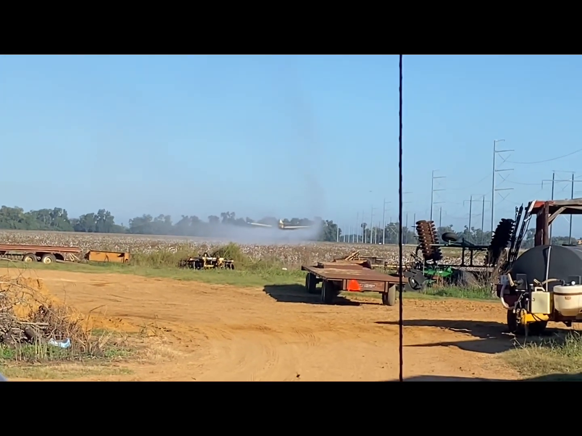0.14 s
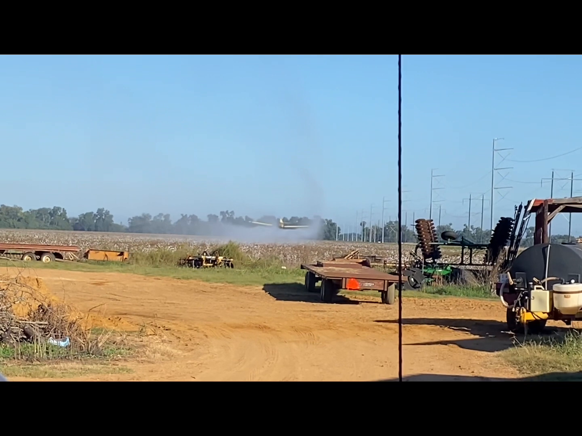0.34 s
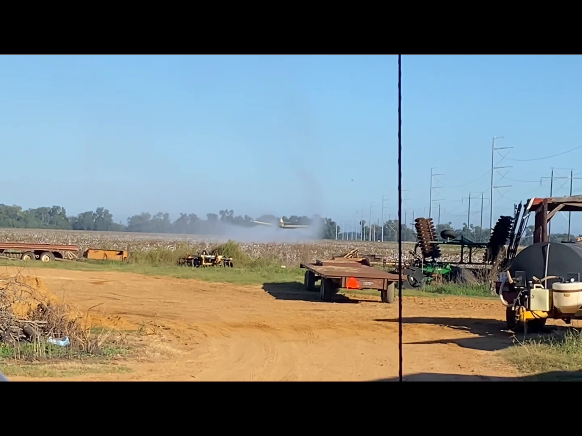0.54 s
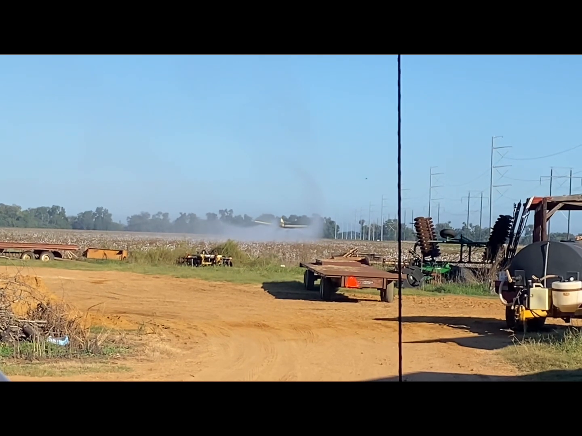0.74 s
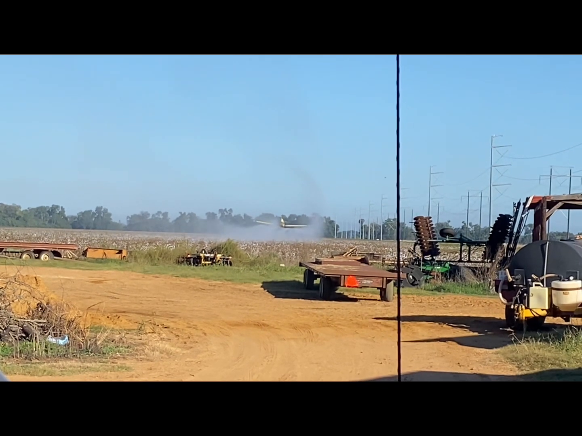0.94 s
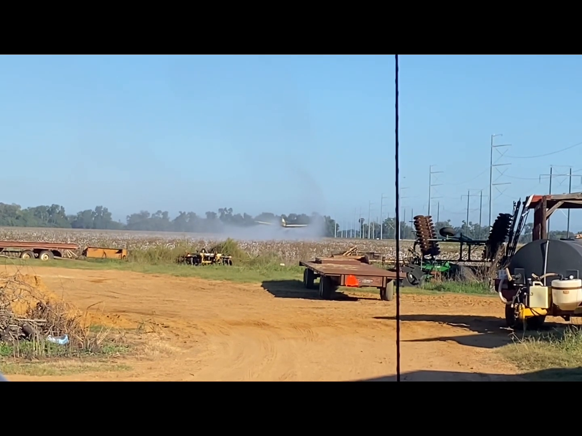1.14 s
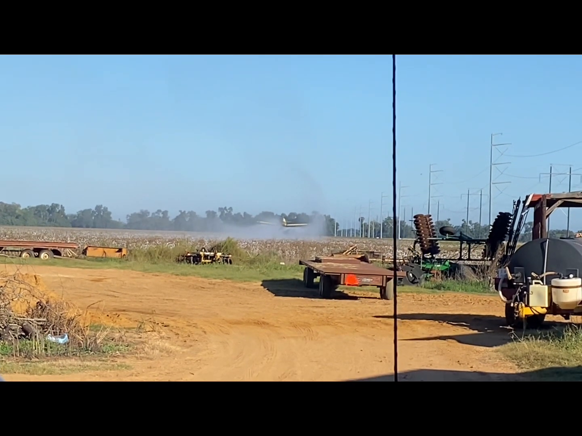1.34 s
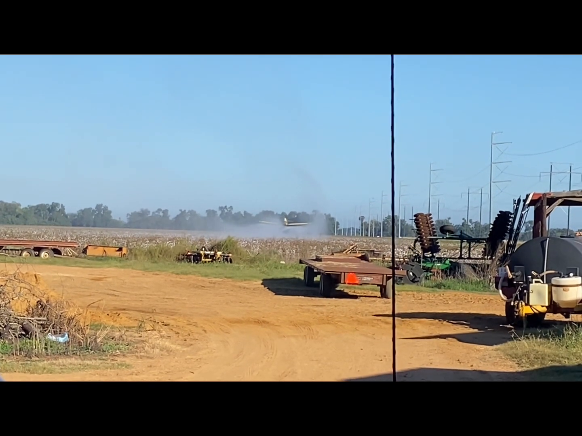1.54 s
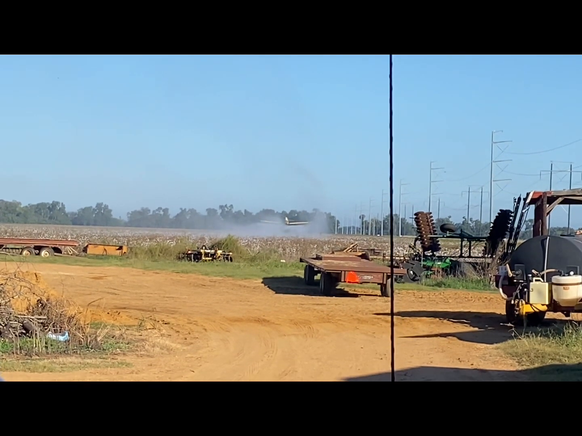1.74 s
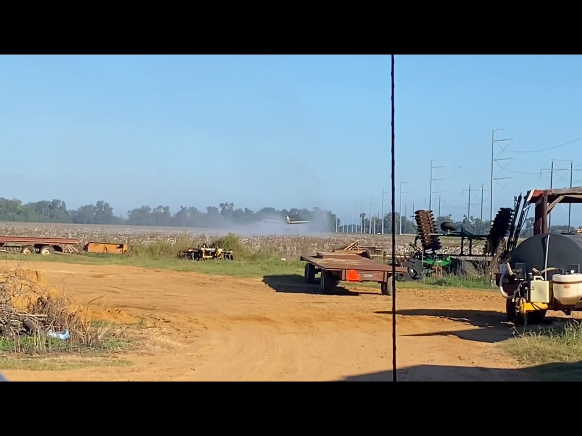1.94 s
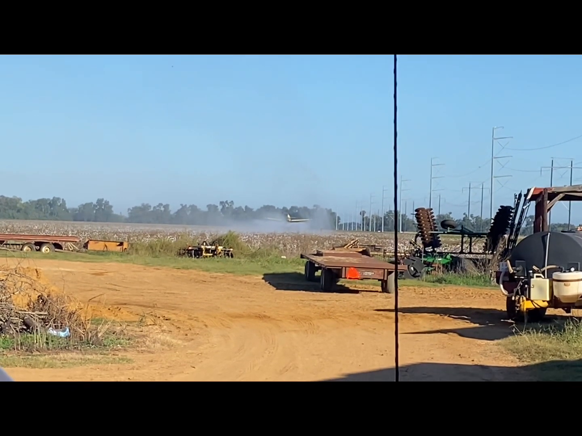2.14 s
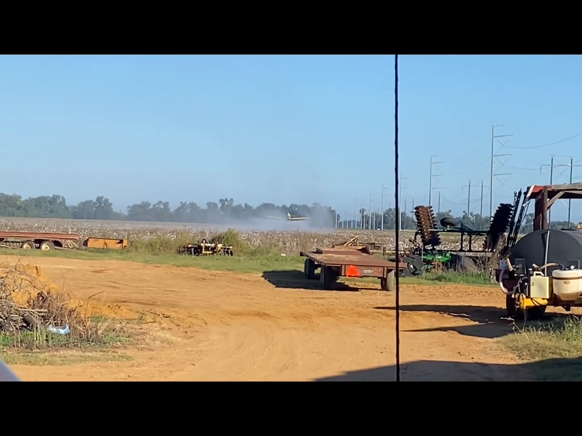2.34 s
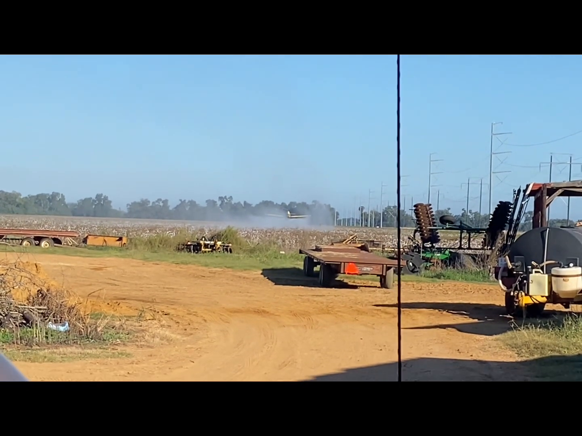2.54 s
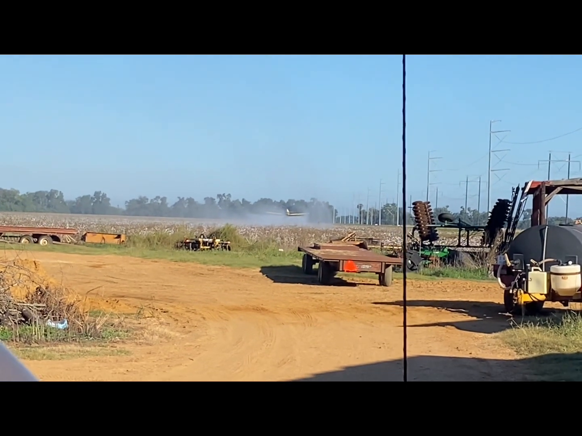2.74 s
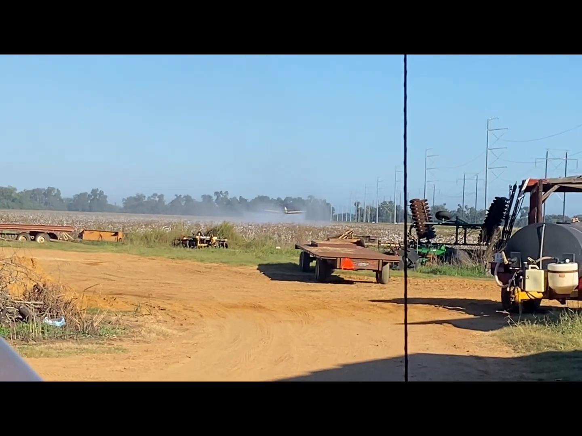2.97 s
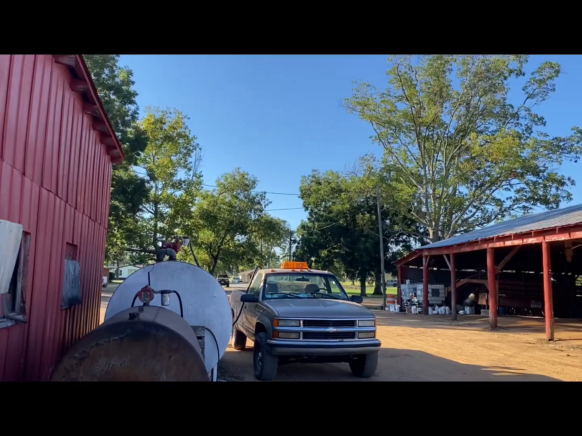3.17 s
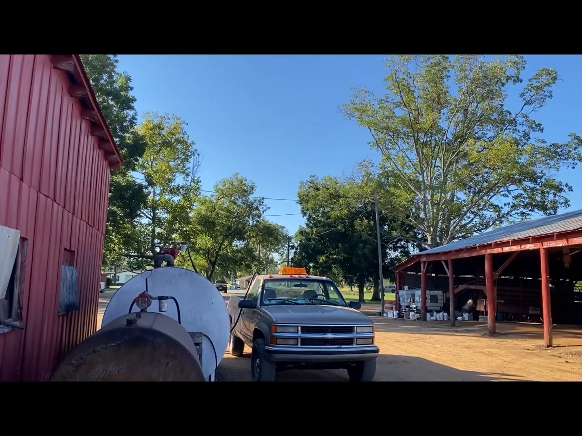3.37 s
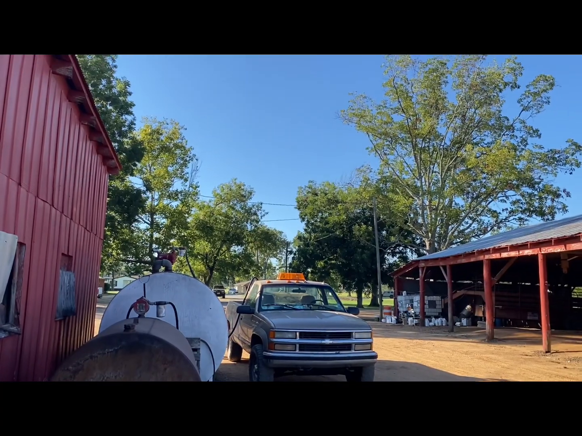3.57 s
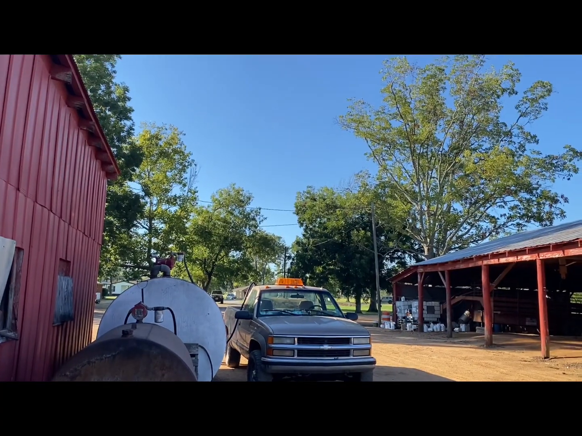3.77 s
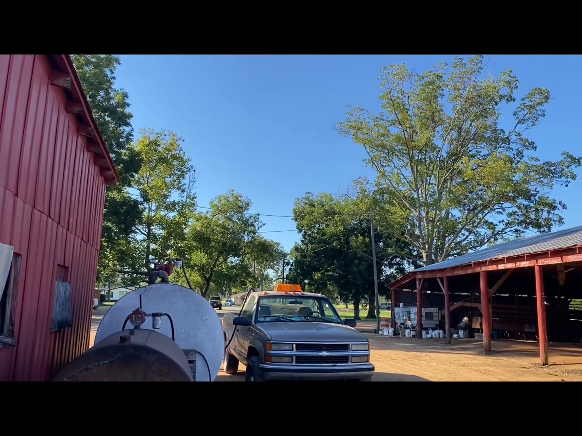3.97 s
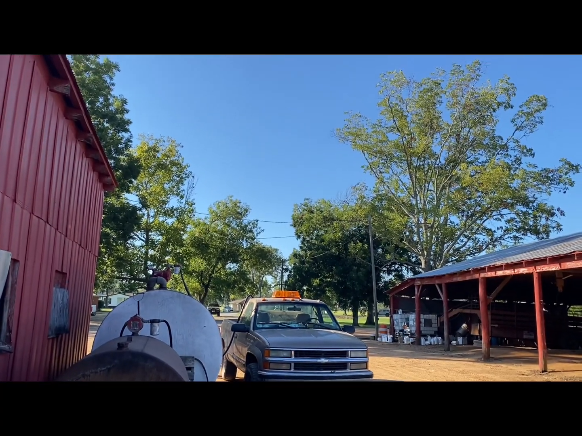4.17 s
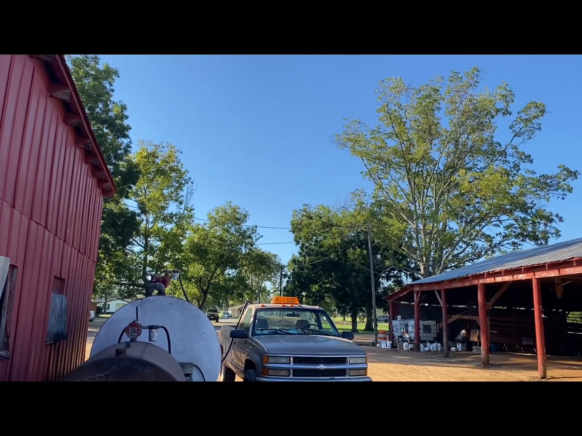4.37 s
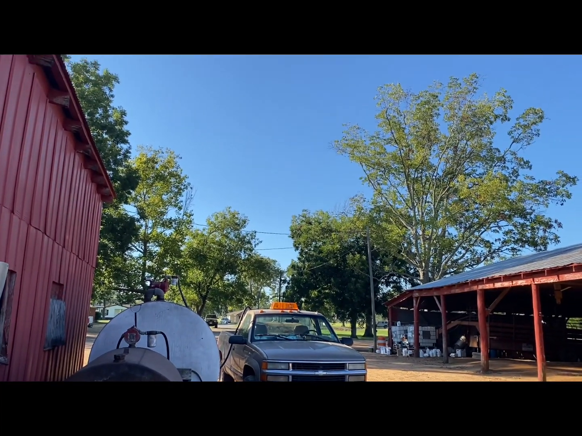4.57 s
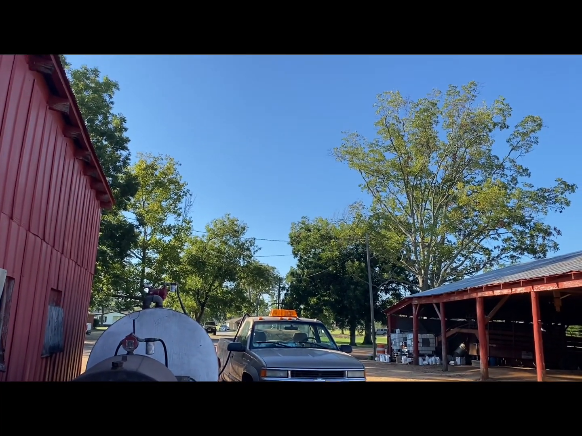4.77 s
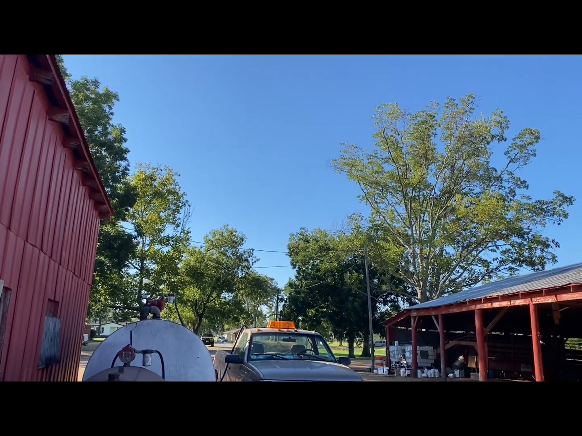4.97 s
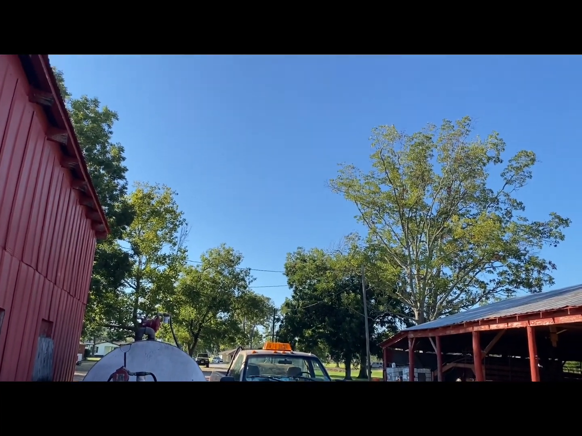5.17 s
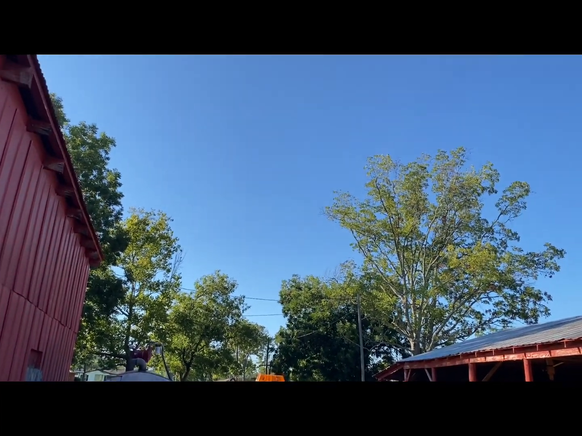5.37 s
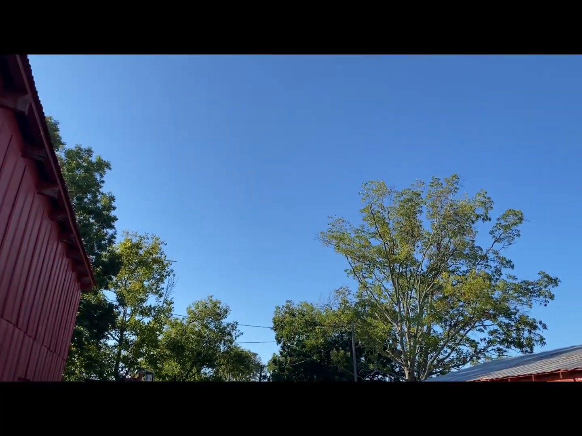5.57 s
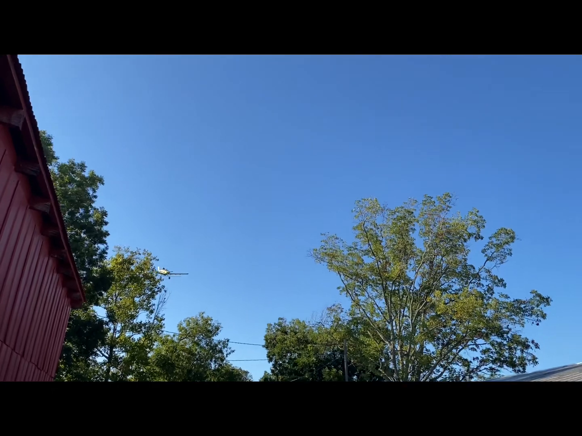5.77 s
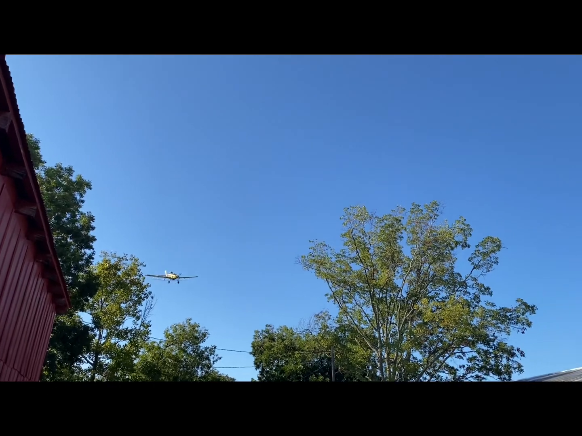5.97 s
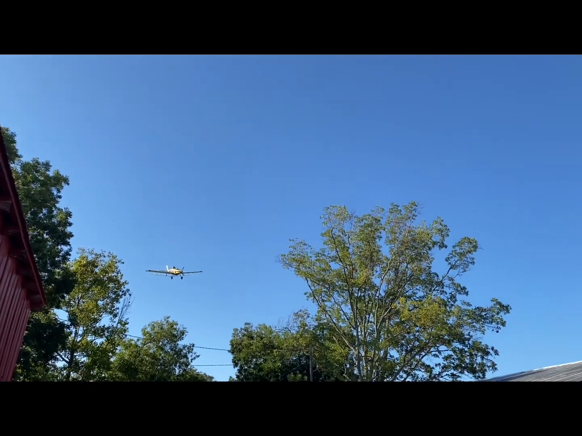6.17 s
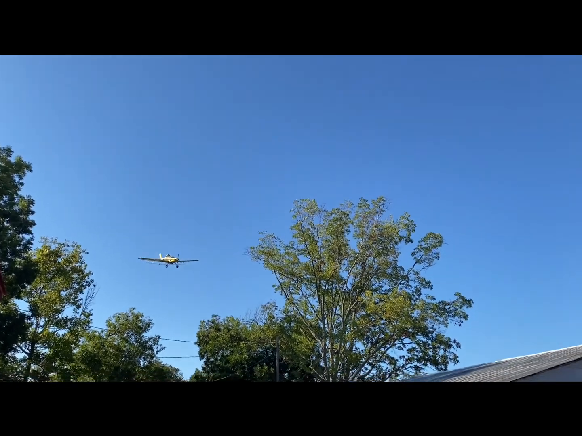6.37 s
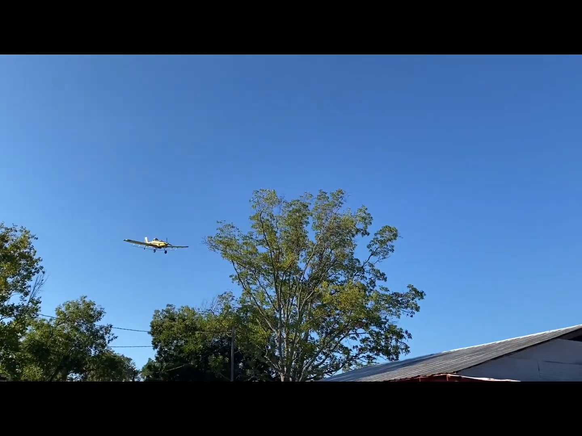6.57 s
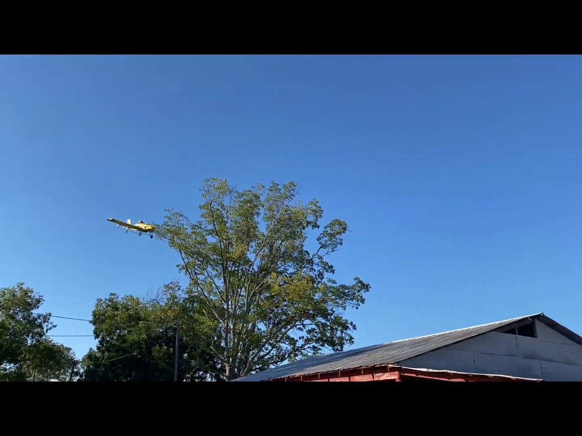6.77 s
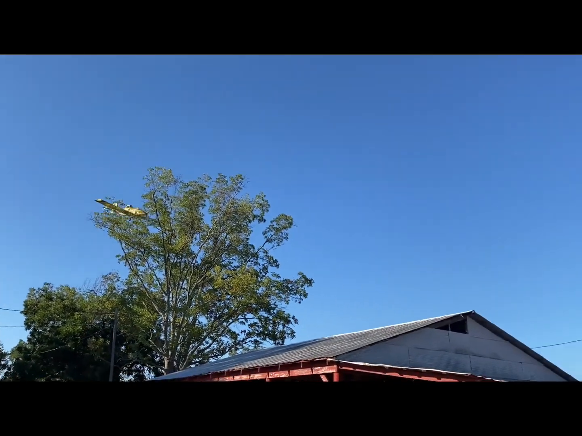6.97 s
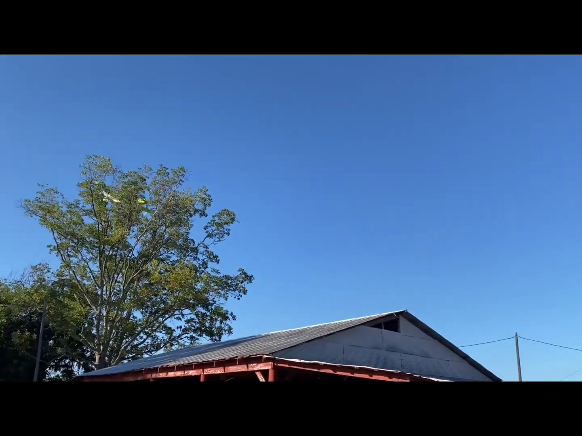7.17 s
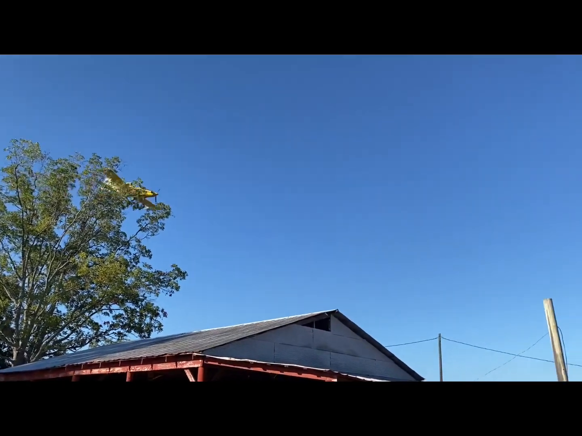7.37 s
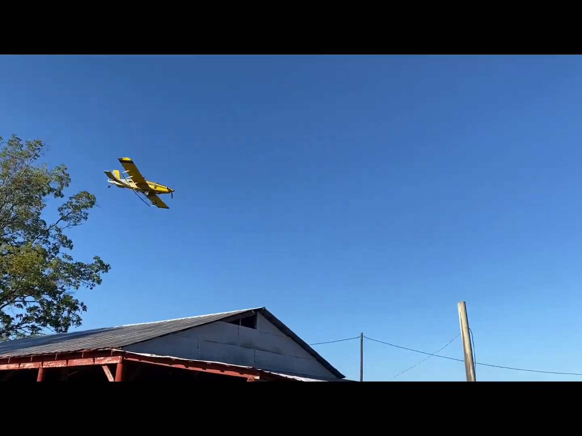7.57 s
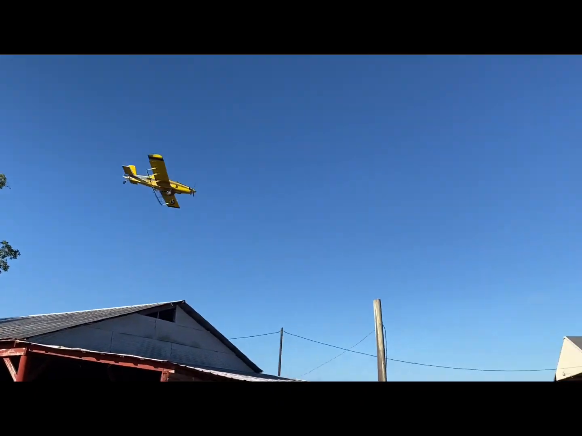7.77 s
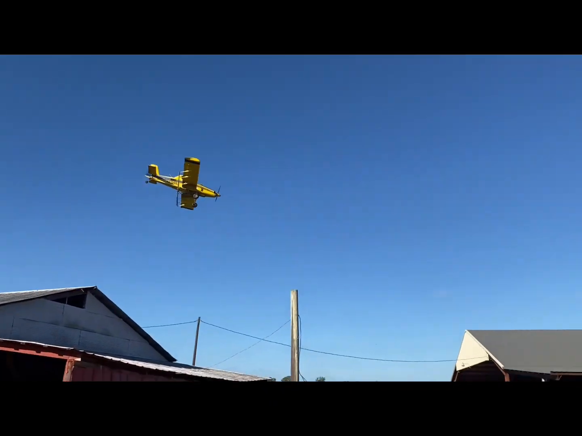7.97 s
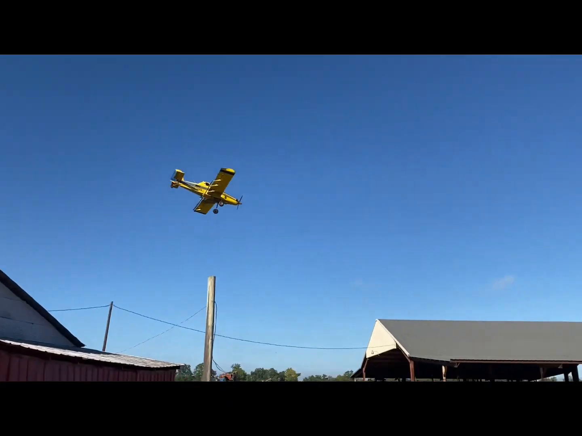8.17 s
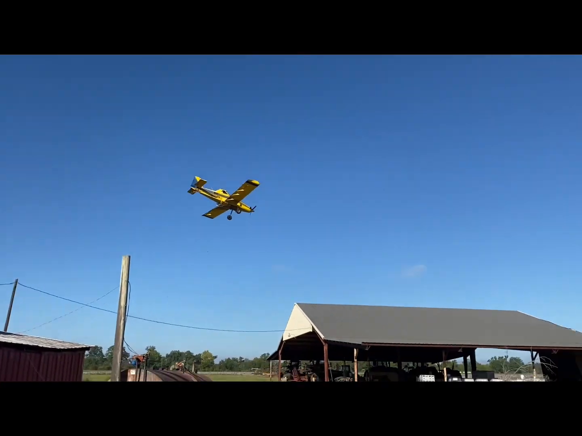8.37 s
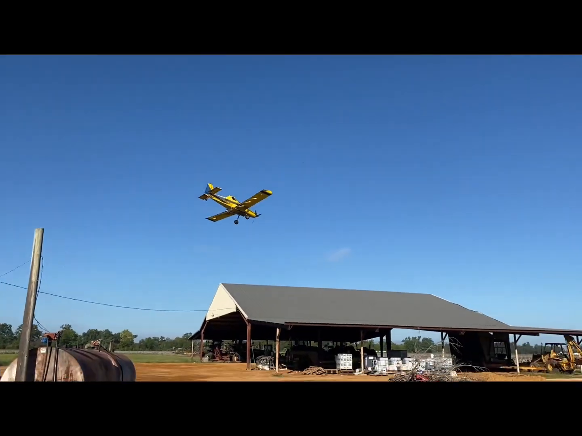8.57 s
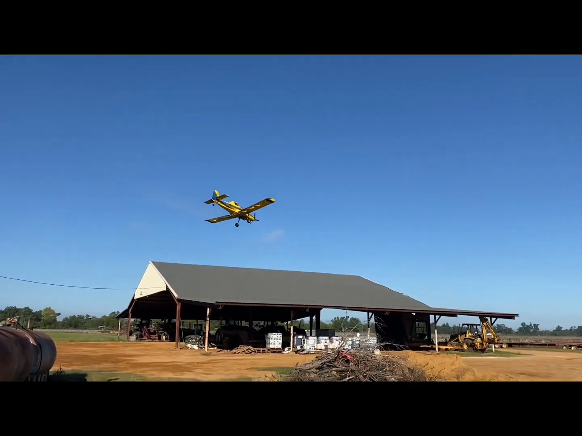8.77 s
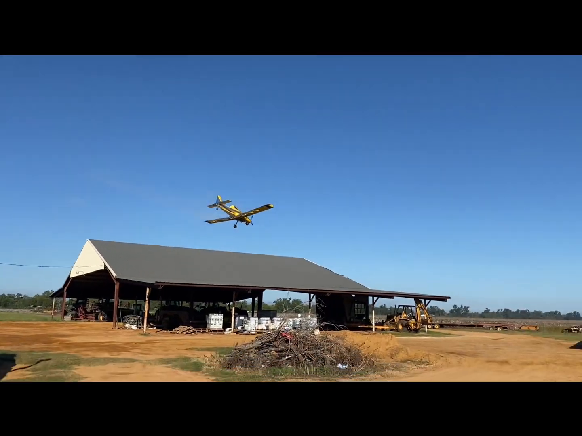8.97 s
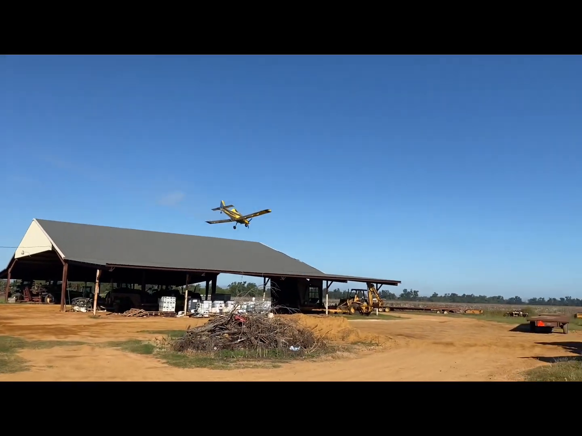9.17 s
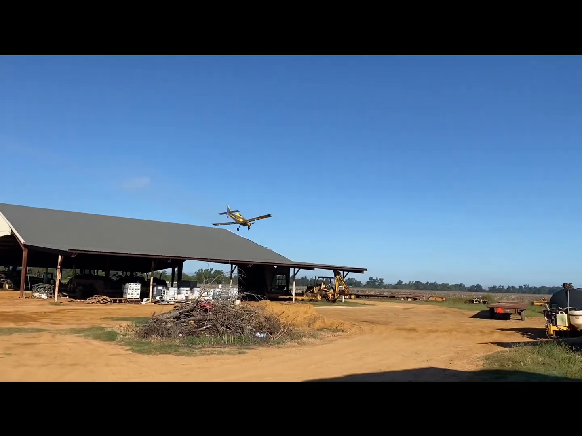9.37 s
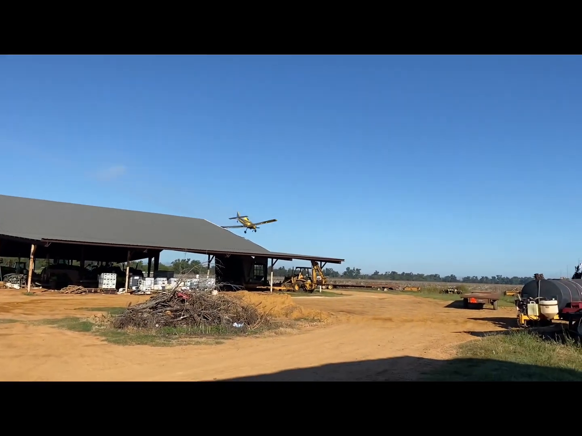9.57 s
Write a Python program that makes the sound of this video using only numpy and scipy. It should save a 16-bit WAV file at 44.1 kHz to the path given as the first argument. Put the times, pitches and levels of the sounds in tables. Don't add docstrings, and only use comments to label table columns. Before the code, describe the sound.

Outdoors on a farm, a pump engine drones very close to the microphone, its low tones beating and its casing rattling with a hissy edge. Abruptly the spot changes: the engine is duller and further off, and a turboprop spray plane approaches from behind trees, swells into a loud roaring, whining pass, then drops in pitch as it leaves.

```python
import sys
import numpy as np
from scipy import signal
from scipy.fft import rfft, irfft, next_fast_len
from scipy.io import wavfile
from scipy.ndimage import uniform_filter1d, map_coordinates

SR = 44100
rng = np.random.default_rng(int(sys.argv[2]) if len(sys.argv) > 2 else 0)


def digitize_waveform(pressure):
    field = np.atleast_2d(pressure).T
    bounded = np.clip(field, -1, 1)
    quanta = np.round(bounded * 32767).astype(np.int16)
    wavfile.write(sys.argv[1], SR, quanta)


def volts(x):
    e = np.asarray(x, float) / 20
    return 10 ** e


N = 423801


def unit(x):
    return x / np.sqrt(np.mean(x ** 2) + 1e-20)


def along(points, hz):
    f, v = np.transpose(points)
    return np.interp(np.log(hz + 1), np.log(f + 1), v)


def shape(points):
    return lambda hz: volts(along(points, hz))


def wobble(rate):
    knots = rng.standard_normal(int(N * rate / SR) + 4)
    return map_coordinates(knots, [np.arange(N) * rate / SR])


def filtered(x, response):
    m = next_fast_len(N + SR // 2)
    return irfft(rfft(x, m) * response(np.fft.rfftfreq(m, 1 / SR)), m)[..., :N]


def rush(gain, alike, patchy_db):
    z = signal.stft(rng.standard_normal((2, N)), nperseg=512)[2]
    field = uniform_filter1d(rng.standard_normal(z.shape[1:]), size=6, axis=0)
    field = uniform_filter1d(field, size=12, axis=1)
    pair = signal.istft(z * volts(patchy_db * unit(field)), nperseg=512)[1][:, :N]
    turn = lambda hz: np.arccos(np.clip(along(alike, hz), -1, 1)) / 2
    mid, side = filtered(pair, lambda hz: gain(hz) * [np.cos(turn(hz)), np.sin(turn(hz))])
    return unit(np.array([mid + side, mid - side]))


def placed(pair, pan, lag_ms):
    sides = np.array([[.5], [-.5]])
    lag = lambda hz: np.exp(-2j * np.pi * hz * sides * lag_ms / 1000)
    return filtered(pair, lambda hz: volts(sides * along(pan, hz)) * lag(hz))


def tone(turns, db, flutter_db, drift):
    level = np.sqrt(2) * volts(db + flutter_db * wobble(12))
    return level * np.sin(2 * np.pi * turns + drift * wobble(9))


def casing(f):
    # centre_hz, width_hz, level_db
    rattle = [(565, 65, 10), (710, 38, 8.5), (1020, 66, 5), (2300, 60, 0.5), (2721, 51, 11), (2990, 180, 4),
              (3116, 190, 3), (3300, 22, 11.5), (3510, 48, 8), (4090, 340, -5.5), (4730, 54, 7),
              (4905, 53, 6.5)]
    return volts(sum(db * (w / 2) ** 2 / ((f - c) ** 2 + (w / 2) ** 2) for c, w, db in rattle))


def pump(shaft_hz, orders, form, buzz_db):
    t = np.arange(N) / SR
    turns = shaft_hz * t + 0.00084 * wobble(2)
    belt = 3.56 * (t - .13) + .5
    tones = 0
    for (k, db, pan_db, belt_db), start in zip(orders, rng.random(len(orders))):
        k = round(k)
        order = np.sin(2 * np.pi * (k * turns + start))
        sideband = volts(belt_db) * np.sin(2 * np.pi * (k * turns + start + belt))
        sides_db = db + 1 + pan_db * np.array([[.5], [-.5]]) - abs(pan_db) / 4
        tones = tones + volts(sides_db) * (order + sideband)
    cycle = rng.standard_normal((2, 1024))
    sides = (cycle[0], 0.92 * cycle.sum(0))
    buzz = np.array([np.interp(turns % 1, np.arange(1024) / 1024, side, period=1) for side in sides])
    buzz = filtered(buzz, lambda f: shape(form)(f) * casing(f) * (f > 250) * (f < 5500))
    return tones, volts(buzz_db) * unit(buzz)


def near_spot():
    # multiple, level_db, left_minus_right_db, belt_sideband_db
    orders = [(1.99, -43.5, -10, -18), (6.08, -31.5, -7, -2), (7.2, -48, -16, -34), (7.92, -29.5, -6, -58),
              (10, -43.5, 15, -33), (12.26, -43, -19, -12), (14, -46, -16, -4.5), (14.1, -68, -6, -24),
              (15.94, -39.5, -5, -53), (17, -60, -20, -14), (17.92, -45, 6, -46), (18.56, -57, -6, 4),
              (20.1, -42, 4, -25.5), (23.3, -47, -1, -32), (24.13, -44.5, -33, -40), (25, -67, 20, -16),
              (25.76, -46.5, -22, -29), (27.07, -63, 25, -24), (29.2, -76, -7, -21), (31.07, -49, -12, -9),
              (32, -49, -13, -27), (34.06, -49, 6, -18), (36, -42.5, -7, -38), (36.8, -50, -6, -34),
              (42.44, -65, 2, 5), (47.8, -72, -13, -12), (56.3, -58, 12, -17), (75.3, -64, -6, -15),
              (79.5, -49.5, -3, -19), (89.4, -49, 28, -11.5)]
    # frequency_hz, level_db (per Hz)
    form = [(15, -61), (25, -58), (50, -5), (140, -7.5), (320, -19.5), (570, -20.5), (1150, -22),
            (1430, -30.5), (2000, -26.5), (2730, -19.5), (3800, -23.5), (7260, -30.5), (11500, -44.5),
            (16000, -52)]
    # frequency_hz, likeness (0 to 1)
    alike = [(60, 1), (130, 0.85), (290, 0.28), (640, 0.063), (1410, 0.044), (3100, 1), (6820, 0.8),
             (15000, 0.53)]
    # frequency_hz, left_minus_right_db
    pan = [(60, -2.5), (130, 6.5), (290, -13.5), (640, 0), (1410, -5), (3100, -0.5), (6820, 0.0),
           (15000, 1)]
    start_db = [-40, -36, -36.5]
    rise_db = [-0.8, 0.77, 0.7]
    t = np.arange(N) / SR
    shaft_hz, low_hz, high_hz = 29.106, 300, 1500
    thrum_db, casing_db, hiss_db = [db + rise * t for db, rise in zip(start_db, rise_db)]
    tones, buzz = pump(shaft_hz, orders, form, buzz_db=-41.5)
    noise = rush(lambda f: shape(form)(f) * casing(f), alike, patchy_db=1.0)
    noise = noise * (1 + .08 * np.cos(2 * np.pi * shaft_hz * t)) * volts(.4 * wobble(5))
    noise = volts(-31.5) * noise + buzz
    share = lambda lo, hi: filtered(noise, lambda f: 1 / (1 + (f / hi) ** 4) - 1 / (1 + (f / lo) ** 4))
    layers = volts(thrum_db + 40.0) * share(1, low_hz)
    layers = layers + volts(casing_db + 38.5) * share(low_hz, high_hz)
    layers = layers + volts(hiss_db + 36.0) * share(high_hz, SR)
    return placed(layers, pan, lag_ms=0.022) + tones


def yard():
    # multiple, level_db, left_minus_right_db, belt_sideband_db
    orders = [(6, -49, 5, 0), (8, -45, 12, -18), (16, -54, 3, -13), (24, -53, 0, -16), (26, -56, 0, -8),
              (32, -57, 0, -3), (35, -52, 6, -7), (40, -60, 6, 0), (80, -63, 8, -13), (88, -68, 11, -14),
              (112, -65, 9, -8)]
    # frequency_hz, level_db (per Hz)
    form = [(15, -66), (25, -30), (55, -10.5), (240, -13.5), (367, 0.5), (508, -16), (820, -18),
            (1120, -12.5), (1310, -28), (2400, -28.5), (3300, -27), (3900, -34.5), (7260, -47),
            (16000, -47)]
    # frequency_hz, likeness (0 to 1)
    alike = [(60, 1), (130, 0.78), (290, 1), (640, 0.72), (1410, 0.31), (3100, 0.43), (6820, 0.31),
             (15000, 0.35)]
    # frequency_hz, left_minus_right_db
    pan = [(60, -1), (130, 3), (290, 0.5), (640, 2.5), (1410, 6.5), (3100, 5.5), (6820, -1), (15000, 4)]
    tones, buzz = pump(29.055, orders, form, buzz_db=-42.5)
    noise = rush(lambda f: shape(form)(f) * casing(f) ** 0.67, alike, patchy_db=1.5)
    noise = volts(-34 + 0.21 * wobble(3.0)) * noise
    return placed(noise + buzz, pan, lag_ms=0) + tones


def flight():
    speed_m_s, closest_m, closest_s, sound_m_s, blade_hz = 62.35, 59.5, 8.151, 343, 100.93
    sent = np.linspace(-9, 4, num=4000)
    metres = np.hypot(closest_m, speed_m_s * sent)
    cos = speed_m_s * sent / metres
    s = closest_s + sent + (metres - closest_m) / sound_m_s
    spread_db = 20 * np.log10(closest_m / metres)
    return s, metres, cos, blade_hz / (1 + speed_m_s * cos / sound_m_s), spread_db


def heard(rows):
    s = flight()[0]
    return [np.interp(np.arange(N) / SR, s, row) for row in rows]


def blade_turns():
    return np.cumsum(heard([flight()[3]])[0]) / SR


def trees():
    return 1 / (1 + np.exp(np.clip((flight()[0] - 6.17) / 0.044, -50, 50)))


def fields():
    _, metres, cos, _, _ = flight()
    return np.clip(metres - 201, 0, None) * (cos < 0) / 100


def mirrors():
    # gain, delay_ms per bearing cosine, delay_ms per bearing sine, fixed_delay_ms
    rows = [
        (.59, -1.22, 4.05, .12),
        (.2, -8.64, 3.0, 1.16),
        (-.21, 1.29, 12.49, -3.56),
    ]
    cos = flight()[2]
    delays = [along_ms * cos + across_ms * np.sqrt(1 - cos ** 2) + ms for _, along_ms, across_ms, ms in rows]
    return [row[0] for row in rows], delays


def blade_tones():
    # time_s, gain_db
    fading = [(3.1, 2.5), (4.4, -1.5), (4.9, 3.5), (5.8, 5), (6.2, -2.5), (6.5, -4.5), (7.1, 0.7),
              (7.55, 1.6), (8.2, 0.3), (8.8, 0.3), (9.05, 4), (9.61, -1.5)]
    # time_s, overtone, gain_db, length_s
    bursts = [(3.75, 1, 10, 0.44), (4.603, 3, 6, 0.31), (4.952, 2, 5.5, 0.25), (5.803, 3, 3.5, 0.11),
              (6.497, 2, 10, 0.11), (6.804, 1, 4.5, .15), (6.87, 2, 4, 0.1), (7.007, 3, 7, 0.031),
              (7.12, 2, -9, 0.14), (7.13, 1, -8, 0.052), (7.222, 3, 8.5, 0.07), (7.325, 1, 2.5, 0.067),
              (7.416, 2, 3.5, 0.054), (7.7, 1, 7.5, 0.045), (7.704, 3, -15, 0.093), (7.93, 1, -4.5, 0.22),
              (8.125, 3, 2, 0.34), (9.1, 2, -6, 0.054), (9.398, 2, 8.5, 0.12), (9.5, 1, -21, 0.034),
              (6.646, 5, 17, 0.23), (7.72, 5, -16, 0.29), (7.75, 7, 3, 0.38), (7.9, 9, 1, 0.27),
              (7.9, 11, 3, 0.24), (9.103, 3, -19, .15)]
    scatter_db = [-63, -34, -37.5]
    s, _, cos, hz, spread_db = flight()
    k = np.arange(1, 15)[:, None]
    reflections = zip(*mirrors())
    comb = abs(1 + sum(gain * np.exp(-2j * np.pi * k * hz * ms / 1000) for gain, ms in reflections))
    path_db = spread_db + np.interp(s, *np.transpose(fading))
    beam_db = -11.5 - 2.45 * k - (3.6 + 7 * k) * (cos + .23 - .29 / k) ** 2
    burst_db = sum((k == round(number)) * db * np.exp(-((s - at) / long) ** 2) for at, number, db, long in bursts)
    levels = heard(beam_db + path_db + burst_db - 14 * trees() + 20 * np.log10(comb))
    round_path_db = path_db - 10.5 * cos - 8 * fields()
    round_db = heard([round_path_db + db + burst for db, burst in zip(scatter_db, burst_db)])
    for low, db in enumerate(round_db):
        scattered = volts(2.214 * (db + 3.5 * wobble(5)))
        levels[low] = 10 * np.log10(volts(2 * levels[low]) + scattered)
    turns = blade_turns()
    return sum(tone(n * turns + .04 * n * n, db, flutter_db=.4 + .12 * n, drift=.04 * n)
               for n, db in enumerate(levels, 1))


def engine_whine():
    # time_s, gear_db, compressor_db, length_s
    glints = [(6.3, 5, -20, .2), (6.8, -5, 2, .25), (7.7, 8, 3, .15), (8.25, -10, -1, .25),
              (9.35, 5, 0, .3)]
    s, _, cos, _, spread_db = flight()
    glint = sum(np.outer(row[1:3], np.exp(-((s - row[0]) / row[3]) ** 2)) for row in glints)
    gear_db = -43.5 - 12 * trees()
    compressor_db = -45 - 42 * trees() - 14 * (cos + .31) ** 2
    gear_db, compressor_db = heard(glint + spread_db + [gear_db, compressor_db])
    turns = blade_turns()
    gear = tone(28.3 * turns + .15 * wobble(60), gear_db - 4, flutter_db=2, drift=1)
    smear = .65 * np.array([wobble(200), wobble(200)])
    return gear + tone(96.7 * turns + smear, compressor_db, flutter_db=1.5, drift=1)


def flow_levels():
    # abeam_db, louder_ahead_db, air_loss_db and field_loss_db per 100 m, tree_loss_db
    layers = [
        (-33.5, 6, 1.3, 0, 1.6),
        (-23.5, 4.5, 3.5, 7, -1.5),
        (-35, 6.5, 6.5, 2.5, 1.5),
        (-39.5, 3.5, -0.5, -3, 12.5),
    ]
    # time_s, gain_db
    swell = [(3.1, -2.1), (5.6, 1), (5.68, 2.5), (5.84, 0.5), (6.17, 0), (6.3, 1), (6.58, 1.5),
             (6.67, -0.1), (7.03, 0.5), (7.18, 1.5), (7.64, -0.5), (7.72, 2), (7.94, -2.5), (8.2, 1),
             (8.38, -2), (8.9, 1.5), (9.21, -0.5), (9.61, -0.7)]
    inlet_db = [.1, 0.32, 5, 1.4]
    s, metres, cos, _, spread_db = flight()
    common_db = spread_db + np.interp(s, *np.transpose(swell))
    facing = np.exp(-((cos + 0.718) / 0.13) ** 2)
    rows = []
    for (db, ahead_db, air_db, field_db, tree_db), intake_db in zip(layers, inlet_db):
        loss_db = air_db * (metres - 59.5) / 100 + field_db * fields() + tree_db * trees()
        rows.append(db + common_db - ahead_db * cos - loss_db + intake_db * facing)
    return heard(rows)


def exhaust_hoot(roar_db):
    band = map_coordinates(rng.standard_normal(N // 150 + 4), [np.arange(N) / 150])
    return volts(roar_db - 1.5) * band * np.sin(2 * np.pi * 17.3 * blade_turns())


def airflow(flow_db):
    # frequency_hz, level_db (per Hz)
    rumble = [(22, -47), (45, -6), (90, 4), (150, 1.5), (260, 6), (400, 1), (560, -14), (800, -57)]
    body = [(300, -34.5), (450, 3.5), (600, 3.5), (1000, -0.5), (1400, -1.5), (1800, -10.5), (2400, -48)]
    roar = [(1200, -55), (1600, -2), (2200, 2.5), (3000, -1.5), (4300, -5.5), (5500, -15.5), (7000, -50)]
    hiss = [(3500, -23), (4600, 2.5), (5500, 2.5), (7500, -2.5), (10500, -9.5), (13000, -10.5),
            (16000, -34), (17000, -58)]
    # frequency_hz, likeness (0 to 1)
    alike = [(100, 0.98), (300, 0.87), (700, 0.76), (1500, 0.41), (3000, 0.39), (7000, 0.26), (15000, 0.4)]
    gust_db = .25 * wobble(7)
    trims_db, patches_db = [10.9, 0.91, 5.6, 2.9], [2.46, 1.3, 1.27, 1.9]
    flow = 0
    for db, form, trim_db, patchy_db in zip(flow_db, [rumble, body, roar, hiss], trims_db, patches_db):
        flow = flow + volts(db + trim_db + gust_db) * rush(shape(form), alike, patchy_db)
    ground_ms = heard([mirrors()[1][0]])[0]
    late = np.arange(N) - ground_ms * SR / 1000
    dull = filtered(flow, lambda f: 1 / (1 + (f / 1200) ** 4))
    echo = np.array([np.interp(late, np.arange(N), side) for side in dull])
    return flow + .38 * echo


def plane():
    # frequency_hz, left_minus_right_db
    pan = [(60, 0.5), (180, 1), (550, 4), (1650, 1), (4970, 1.5), (15000, -3)]
    flow_db = flow_levels()
    whine = engine_whine() + exhaust_hoot(flow_db[2])
    return placed(airflow(flow_db) + blade_tones(), pan, lag_ms=-0.18) + placed(whine, pan, lag_ms=-0.022)


def scene():
    first = np.arange(N) < 3.088 * SR
    return np.where(first, near_spot(), yard() + plane())


def low_pass(x):
    return signal.sosfilt(signal.butter(12, 16540, fs=SR, output="sos"), x)


def record(dry):
    # low_hz, high_hz
    missing = [(8350, 9600), (12450, 13900), (15800, 22050)]
    # start_s, end_s, gain_db
    top_gains = [(0, 3.09, 2), (3.3, 6.2, -4), (6.2, 7.6, -12), (7.6, 7.95, -4), (9.2, 9.7, -6)]
    # start_s, end_s, low_hz, high_hz
    mono = [(0, 3.088, 3400, 7600), (5.9, 6.6, 6500, 7600), (8.15, 9.61, 6300, 7600)]
    top_hz = 13900
    dry = dry / (1 + abs(dry / .93) ** 8) ** (1 / 8)
    t = np.arange(N) / SR
    kept = lambda f: 1 - sum((f > lo) * (f < hi) for lo, hi in missing)
    mid = filtered((dry[0] + dry[1]) / 2, lambda f: volts(5 * (f > top_hz)) * kept(f))
    change = sum((volts(db) - 1) * (t >= a) * (t < b) for a, b, db in top_gains)
    mid = mid + change * filtered(mid, lambda f: f > top_hz)
    side = filtered((dry[0] - dry[1]) / 2, lambda f: (f < 14500) * (abs(f - 11050) > 650))
    band = lambda lo, hi: filtered(side, lambda f: (f > lo) * (f < hi))
    side = side - sum((t >= a) * (t < b) * band(lo, hi) for a, b, lo, hi in mono)
    return low_pass(np.array([mid + side, mid - side]))


dry = scene()
out = record(dry)
digitize_waveform(out)
```